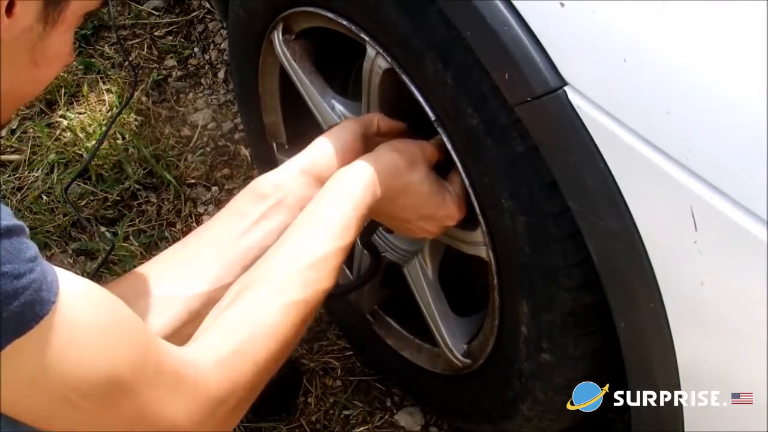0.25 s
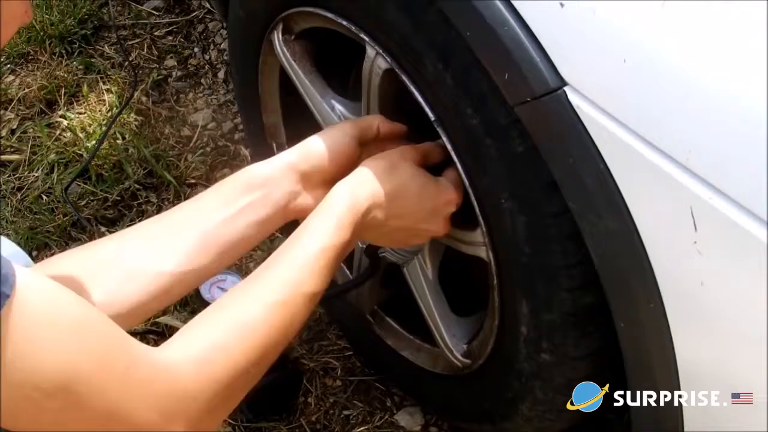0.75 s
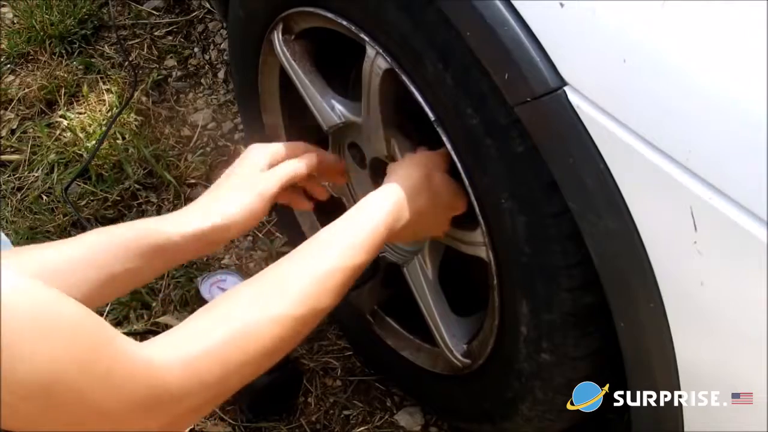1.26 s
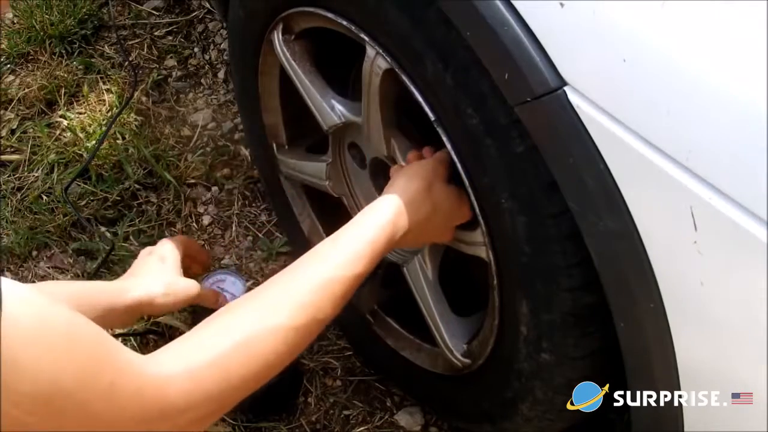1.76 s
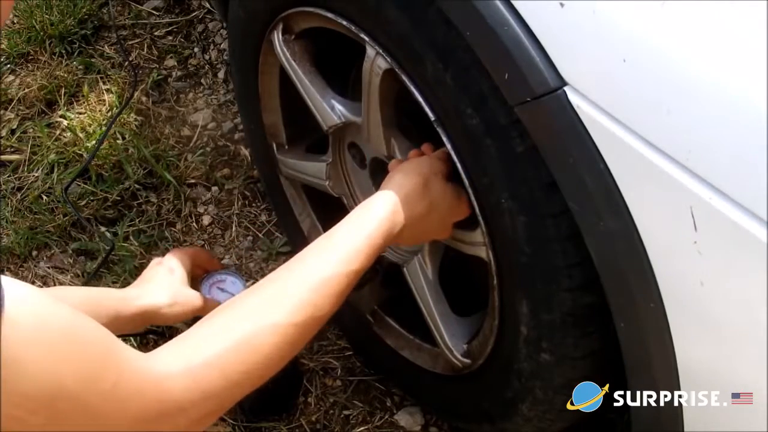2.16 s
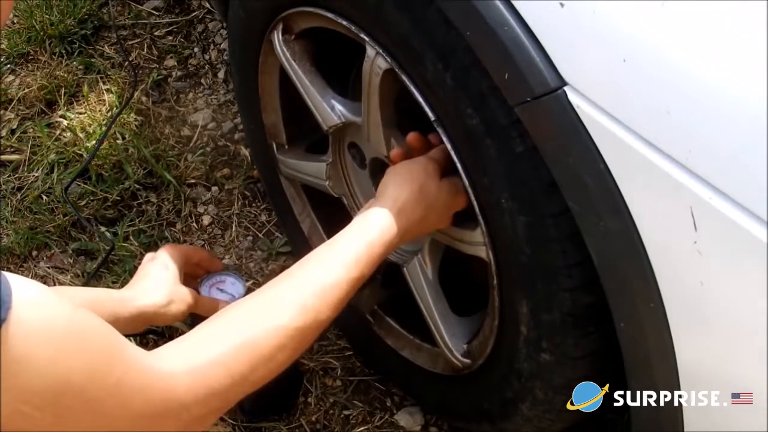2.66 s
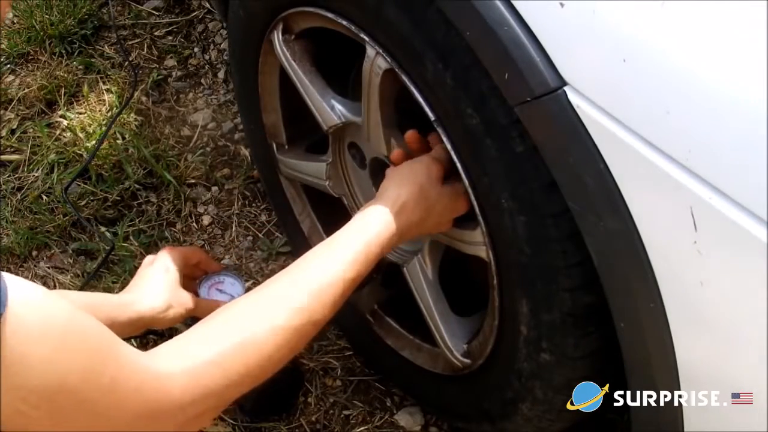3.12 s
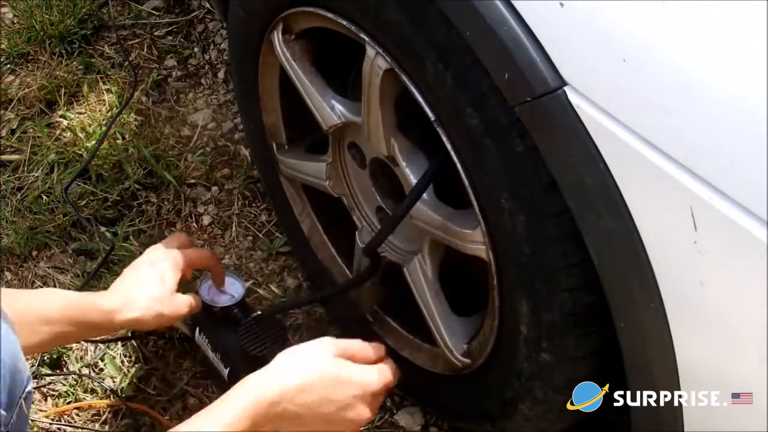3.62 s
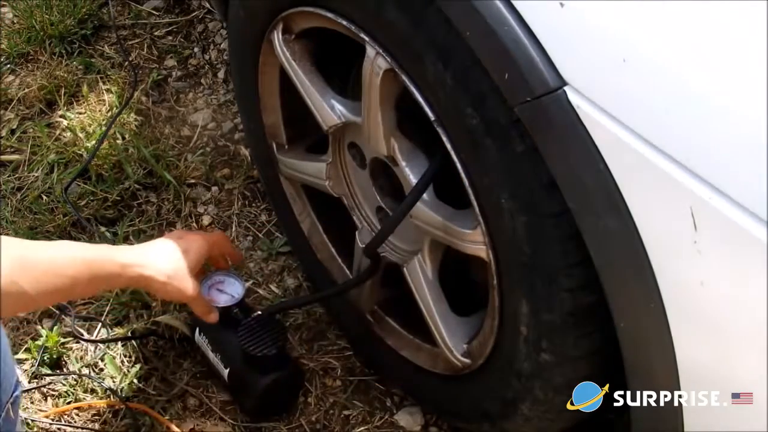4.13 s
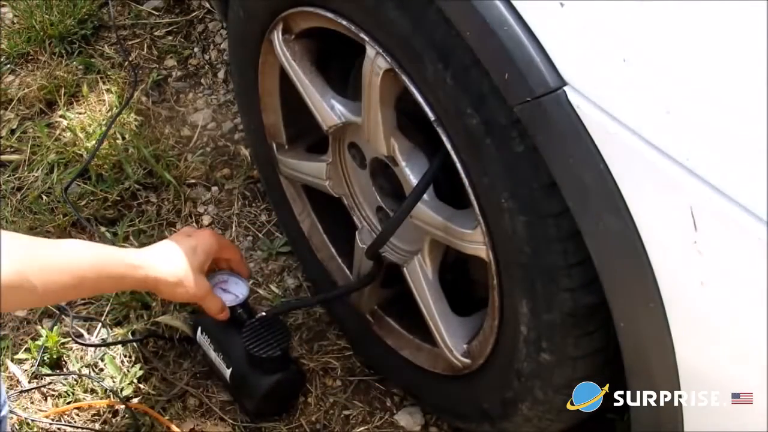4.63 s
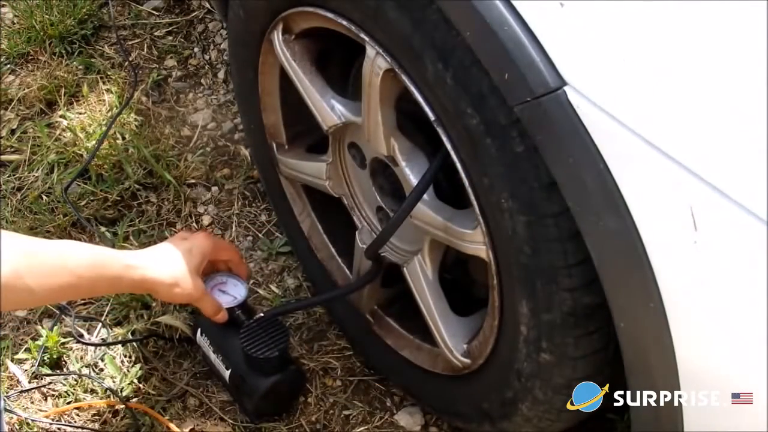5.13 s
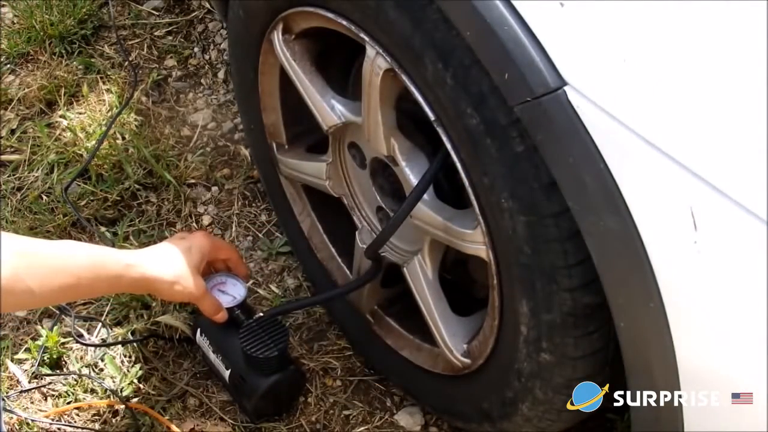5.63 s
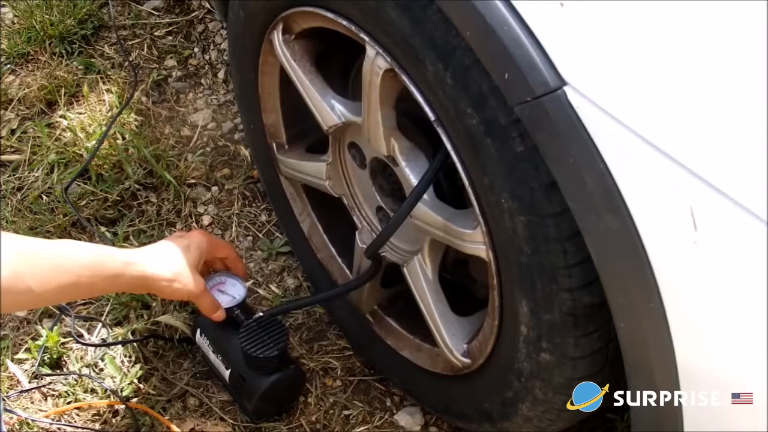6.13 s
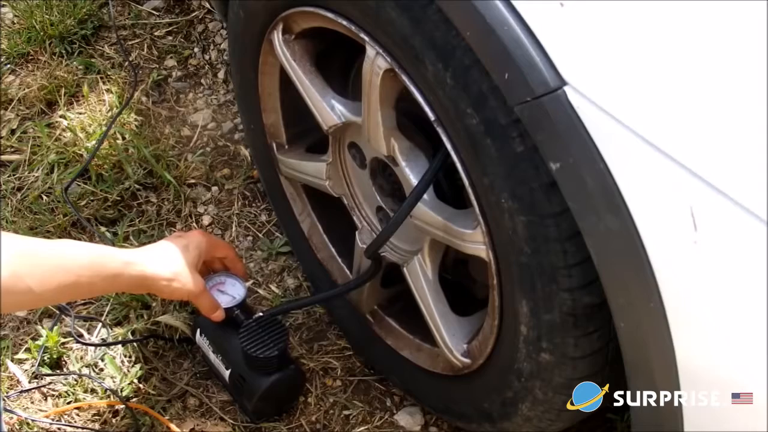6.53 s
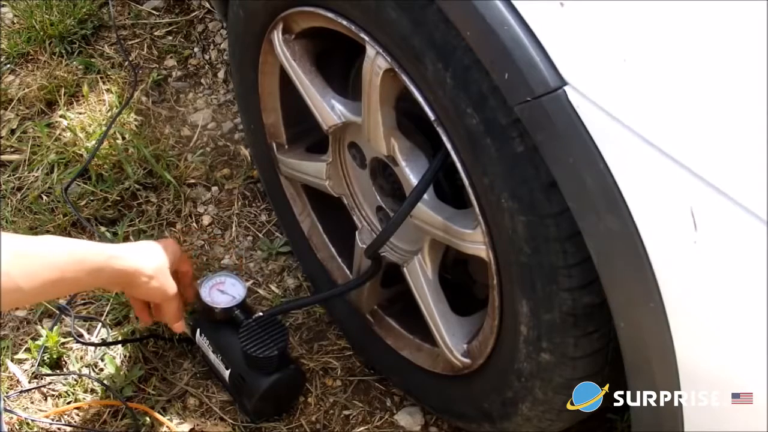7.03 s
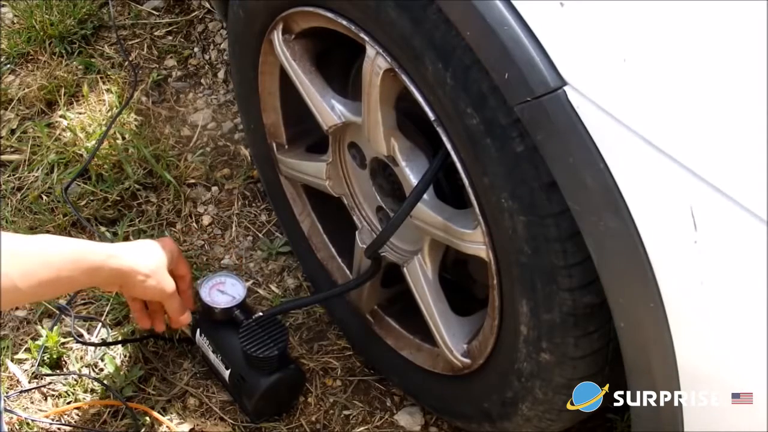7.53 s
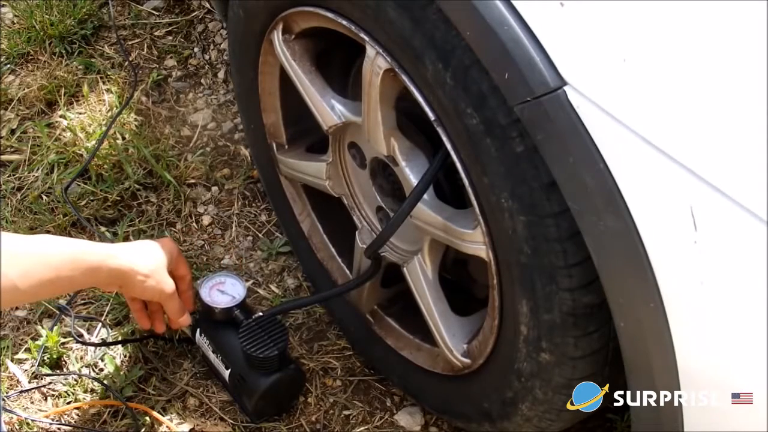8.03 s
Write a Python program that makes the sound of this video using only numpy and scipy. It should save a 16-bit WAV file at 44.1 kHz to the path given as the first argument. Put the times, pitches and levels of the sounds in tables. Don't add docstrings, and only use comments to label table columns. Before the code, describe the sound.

A small portable air compressor runs without pause beside a car wheel, close to the microphone outdoors. Its rapid piston knocking fuses into a harsh, nasal buzz with a metallic whine, plastic rattle and airy hiss. The tone shifts gradually as a hand grips the casing. Soft wind thumps cluster before the middle; later a sharp knock bounces quickly and the level dips, then recovers.

```python
import sys
import numpy as np
from scipy import signal
from scipy.fft import rfft, irfft, next_fast_len
from scipy.io import wavfile
from scipy.ndimage import uniform_filter1d

SR = 44100
rng = np.random.default_rng(int(sys.argv[2]) if len(sys.argv) > 2 else 0)


def level_to_linear(level):
    exponent = np.asarray(level, float) / 20
    return 10 ** exponent


def unload_wav(signal):
    wavfile.write(
        sys.argv[1],
        SR,
        np.round(np.clip(np.atleast_2d(signal).T, -1, 1) * 32767).astype(np.int16),
    )


N = 364707
T = np.arange(N) / SR
SLOW_T = T[::64]
SIZE = next_fast_len(N + SR // 4)
HZ = np.arange(SIZE // 2 + 1) * SR / SIZE
TOP_HZ = 15760


def unit(x):
    return x / np.sqrt(np.mean(x ** 2))


def fine(slow):
    return np.interp(T, SLOW_T, slow)


def through(x, response):
    return irfft(rfft(x, SIZE) * response, SIZE)[:N]


def mode(hz, width):
    return 1j * HZ * width / (hz ** 2 - HZ ** 2 + 1j * HZ * width)


def colour(points):
    hz, db = np.transpose(points)
    return level_to_linear(np.interp(np.log(HZ + 1), np.log(hz), db))


def walk(rate):
    place = SLOW_T * rate
    k = place.astype(int)
    levels = rng.standard_normal(int(9 * rate) + 2)
    blend = np.sin(np.pi / 2 * (place - k)) ** 2
    return 1.15 * (levels[k] + (levels[k + 1] - levels[k]) * blend)


def hits(table, rise, second_db):
    out = np.zeros(N + SR)
    for s, db, hz, t60 in table:
        t = np.arange(int(t60 * SR)) / SR
        shape = (1 - np.exp(-(t * hz / rise) ** 2)) * 1000. ** (-t / t60)
        ring = np.sin(2 * np.pi * hz * t) + level_to_linear(second_db) * np.sin(2 * np.pi * 1.676 * hz * t)
        start = int(s * SR)
        out[start:start + len(t)] += level_to_linear(db) * ring * shape / shape.max()
    return out[:N]


# t/s, rate/(turns per s)
CRANK_SPEED = [(0.0, 45.89), (0.5, 45.855), (0.99, 45.88), (1.65, 45.975), (2.31, 46.005), (3.3, 46.05),
               (3.96, 46.015), (4.62, 45.955), (5.28, 45.93), (5.94, 45.96), (6.6, 46.04), (7.26, 46.06),
               (7.59, 46.02), (8.27, 45.87)]
# t/s, level/dB
ROCKING = [(0.0, -26), (0.45, -27.5), (0.8, -26.5), (1.0, -27), (1.4, -26), (1.95, -27), (2.5, -25.5),
           (2.9, -27), (3.3, -26), (4.1, -26.5), (5.0, -25.5), (5.7, -26), (5.95, -26.5), (6.75, -26),
           (7.0, -27), (7.45, -26), (8.0, -26.5), (8.27, -26.5)]
# t/s, grip/(0-1)
HAND_GRIP = [(0, 0.05), (1.3, 0.17), (1.8, 0.28), (3.6, 0.46), (4.2, 0.7), (5, 1), (8.27, 1)]


def pump():
    turn = np.cumsum(np.interp(T, *np.transpose(CRANK_SPEED)) * fine(1 + .0005 * walk(25))) / SR
    held = np.interp(SLOW_T, *np.transpose(HAND_GRIP))
    level_db = np.interp(SLOW_T, *np.transpose(ROCKING))

    def gain(free_db, held_db):
        return fine(level_to_linear(level_db + free_db + (held_db - free_db) * held))

    body = level_to_linear(-3.0) * casing(BODY_MODES, turn, held, repeat=.03, lag=.1,
                              knock_db=3.0, flicker_db=1.5, spiky_db=1.5)
    body = body + piston(turn, held)
    mesh = casing(MESH_MODES, turn, held, repeat=0.28, lag=0.28,
                  knock_db=3.5, flicker_db=2.0, spiky_db=3.0)
    treble = level_to_linear(-1.5) * casing(TREBLE_MODES, turn, held, repeat=0.38, lag=0.27,
                                knock_db=5.0, flicker_db=0.84, spiky_db=2.0)
    treble = treble + valve(turn, held) + level_to_linear(-2.5) * valve_air(turn) + level_to_linear(-7.0) * outlet_hiss(turn)
    return gain(1.5, -4) * body + gain(-7, -5.5) * mesh + gain(0.32, -1.4) * treble


# crank angle/(turn 0-1), level/dB
KNOCKS_PER_TURN = [
    (.13, -1),
    (.49, 0),
    (.89, -4),
]
# multiple of the crank rate, level/dB
PISTON_LINES = [(1, -28), (2, -25), (3, -24.5), (4, -16.5), (5, -18.5), (6, -12.5), (7, -16.5), (8, -21),
                (9, -5.5), (10, -12.5), (11, -9.5), (12, 1), (13, -10.5), (14, -4), (15, 0), (16, -3.5),
                (17, -7.5), (18, 0.5), (19, -8.5), (20, -7), (21, -4.5), (22, -5.5), (23, -2), (24, 1),
                (25, -5), (26, -21), (27, -4.5), (28, -1), (29, -18), (30, -7.5), (31, -7), (32, -13),
                (33, -6.5), (34, -4), (35, -27), (36, -4), (37, -20.5), (38, -2.5), (39, -19.5), (40, -7),
                (41, -3.5), (42, -4)]


def piston(turn, held):
    motor_hz, motor_db, wobble_rad = 587.2, -11.5, 0.083
    lines, spin, crank = 0, 1, np.exp(2j * np.pi * turn)
    for k, db in PISTON_LINES:
        spin = spin * crank
        knocks = sum(level_to_linear(knock_db) * np.exp(-2j * np.pi * k * at) for at, knock_db in KNOCKS_PER_TURN)
        phase = np.angle(knocks) - .004 * k ** 2 + 0.011 * k * walk(12)
        grip_db = (4 - 9 * held) * np.exp(-((k - 24) / 1.5) ** 2)
        level = level_to_linear(db + grip_db + .9 * walk(5))
        lines = lines + (spin * fine(level * np.exp(1j * phase))).real
    motor = np.sin(2 * np.pi * motor_hz * T + wobble_rad * crank.imag + fine(0.56 * walk(4)))
    return level_to_linear(-3.0) * unit(lines) + fine(level_to_linear(motor_db + .6 * walk(4.06))) * motor


# f/Hz, width/Hz, free level/dB, held level/dB, loudest angle/(turn 0-1), swing per turn/dB
BODY_MODES = [(585, 98, -14.5, -15.5, 0, 1), (821, 74, -5.5, -5.5, 0.35, 3), (937, 80, -9, -3.5, 0.1, 4.5),
              (1106, 59, -2.5, -2, 0.1, -2.5), (1285, 40, -4.5, -2, 0.29, 3.5),
              (1530, 39, -3.5, -0.5, 0.16, 1), (1657, 56, -2, -10, 0.1, 6), (1839, 220, -9, -6, .25, 1.5)]
MESH_MODES = [(2422, 214, -4, -1.5, 0.011, 0.95), (2652, 97, -10.5, -12, 0.0048, 0.67),
              (2750, 330, -2.5, -15.5, 0.045, 0.4)]
TREBLE_MODES = [(3561, 192, -7.5, -1, 0, 4.6), (3728, 120, -8.5, -3.5, 0.12, 2.4),
                (4357, 170, -6, -5.5, 0.15, 3.8), (4770, 150, -6.5, -4.5, 0.14, 2.8),
                (5150, 420, -8, -7, 0.15, 1), (5780, 205, -11.5, -10.5, 0, 4.6),
                (6290, 210, -10.5, -13, 0.16, 4), (7060, 230, -17.5, -9.5, 0.82, 10.1),
                (7370, 140, -17, -9.5, 1, 2.3)]


def casing(modes, turn, held, repeat, lag, knock_db, flicker_db, spiky_db):
    slots = 960
    slot = (turn * slots).astype(int) % slots
    angle = np.arange(slots) / slots
    shake = clatter(slot, slots, repeat, wear=1.2, spiky_db=spiky_db)
    jolts = sum(level_to_linear(db) * np.exp(5.0 * (np.cos(2 * np.pi * (angle - at - .03)) - 1))
                for at, db in KNOCKS_PER_TURN)
    out = 0
    for hz, width, free_db, held_db, at, swing_db in modes:
        stroke_db = swing_db * np.cos(2 * np.pi * (angle - at - lag)) + knock_db * jolts
        ring = through(shake * level_to_linear(stroke_db)[slot], mode(hz, 1.33 * width) ** 2)
        out = out + ring * fine(level_to_linear(free_db + (held_db - free_db) * held + flicker_db * walk(6)))
    return out / np.sqrt(uniform_filter1d(out ** 2, SR // 2))


def clatter(slot, slots, repeat, wear, spiky_db):
    pattern = rng.standard_normal((2, slots))[:, slot]
    same = np.cos(wear * T) * pattern[0] + np.sin(wear * T) * pattern[1]
    sizes = np.minimum(rng.exponential(size=N), 5)
    fresh = unit(rng.standard_normal(N) * level_to_linear(spiky_db * sizes))
    return np.sqrt(repeat) * same + np.sqrt(1 - repeat) * fresh


# f/Hz, free level/dB, held level/dB, angle/(turn 0-1), rise/s
REED_PINGS = [
    (4320, -7.5, -14.5, .27, .0022),
    (4730, -13, -10.5, .19, .002),
    (7085, -23.5, -16.5, .1, .0012),
]


def valve(turn, held):
    slop_s, scatter_db = 1.8e-5, 1.6
    out, chance = 0, rng.standard_normal((int(turn[-1]) + 3, 2))
    for hz, free_db, held_db, at, rise in REED_PINGS:
        late, size = chance[np.floor(turn - at).astype(int) + 1].T
        since = (turn - at) % 1 / CRANK_SPEED[0][1]
        ping = since * np.exp(-since / rise) * np.sin(2 * np.pi * hz * (since - slop_s * late))
        out = out + unit(ping * level_to_linear(scatter_db * size)) * fine(level_to_linear(free_db + (held_db - free_db) * held))
    return out


# f/Hz, density level/dB per Hz
AIR_SPECTRUM = [(59, -56), (100, -42), (358, -12.5), (549, -3.5), (1400, -2.5), (3300, -3.5), (7000, -12.5),
                (16200, -24)]


def valve_air(turn):
    swell_db = 1.4 * np.cos(2 * np.pi * (turn - .3))
    return unit(through(rng.standard_normal(N) * level_to_linear(swell_db), colour(AIR_SPECTRUM)))


# f/Hz, density level/dB per Hz
HISS_SPECTRUM = [(7300, -36.5), (8000, -8.5), (10050, -0.5), (11500, 0), (12500, -7.5), (14500, -5),
                 (15700, -10), (17000, -40)]


def outlet_hiss(turn):
    swell_db = 1.6 * np.cos(2 * np.pi * (turn - .35)) + 1.4 * np.cos(4 * np.pi * (turn - .07))
    jet = rng.standard_normal(N) * fine(level_to_linear(1.2 * walk(90))) * level_to_linear(swell_db)
    return unit(through(jet, colour(HISS_SPECTRUM)))


# t/s, peak level/dB, f/Hz, t60/s
KNOCK_BOUNCES = [
    (5.1124, -4.5, 1300, 0.0095),
    (5.1127, -23, 3600, .004),
    (5.1160, -23, 1200, .015),
    (5.1203, -7, 1150, 0.014),
    (5.1250, -10, 1330, 0.011),
    (5.1257, -12, 2600, 0.004),
    (5.1335, -10, 1410, 0.024),
]


def knock():
    return hits(KNOCK_BOUNCES, rise=0.46, second_db=-14)


# t/s, peak level/dB, f/Hz
SHORT_THUMPS = [(1.718, -27, 152), (2.431, -41, 180), (3.405, -26, 100), (3.215, -19.5, 207),
                (3.288, -26, 78.1), (3.314, -16.5, 232), (3.345, -20, 140), (3.358, -20.5, 232),
                (3.394, -14.5, 313), (3.511, -13.5, 328), (3.5428, -14, 520), (3.556, -14.5, 360),
                (3.564, -20, 328), (3.642, -20, 280), (3.709, -27, 210), (3.767, -32, 108),
                (4.554, -33, 103), (5.391, -21.5, 139), (5.631, -33, 172), (5.721, -31, 194),
                (5.828, -9, 450), (5.842, -19, 433), (5.886, -23, 146), (5.958, -31, 190),
                (7.163, -31, 91.5), (7.45, -29, 170), (7.733, -25, 217), (7.75, -30, 133), (7.812, -31, 194),
                (8.071, -33, 61)]


def thumps():
    rings = [(s, db, hz, min(.04, 7.5 / hz)) for s, db, hz in SHORT_THUMPS]
    return hits(rings, rise=0.59, second_db=-6.0)


# t/s, peak level/dB, length/s
WIND_GUSTS = [(2.0, -43, .03), (2.08, -40, .07), (2.306, -41, 0.034), (2.448, -34.5, .04), (2.56, -39, .07),
              (2.794, -39, 0.033), (2.9, -43, .04), (3.06, -36.5, 0.12), (3.215, -35, .05),
              (3.328, -25, 0.11), (3.555, -31, 0.066), (3.65, -33, 0.035), (3.766, -34, 0.054),
              (3.91, -38, .045), (4.14, -43, 0.055), (4.29, -38, .04), (4.567, -40, 0.036), (4.92, -47, .1),
              (5.4, -32, 0.039), (5.56, -42, .06), (5.64, -45, .03), (5.76, -37, .06), (5.906, -35, 0.096),
              (6.697, -43, .09), (7.175, -42, 0.13), (7.47, -36, .07), (7.6, -37, .06), (7.745, -33, .07),
              (7.95, -47, 0.039), (8.08, -39, 0.03)]
# f/Hz, density level/dB per Hz
GUST_SPECTRUM = [(10, -45), (25, -11), (60, -3.5), (130, -0.5), (250, -8.5), (400, -23.5), (700, -47.5)]


def gusts():
    calm_db, fall_db, rise = -58.5, -15, 0.71
    lumps = unit(rng.standard_normal(N) * fine(level_to_linear(3.5 * walk(60))))
    swell = level_to_linear(calm_db)
    for s, db, length in WIND_GUSTS:
        away = np.maximum(SLOW_T - s, (s - SLOW_T) / rise) / length
        swell = swell + level_to_linear(db + fall_db * away)
    return level_to_linear(20.0) * through(lumps * fine(swell), colour(GUST_SPECTRUM))


def scene():
    return (pump() + knock() + thumps() + gusts())[None]


# f/Hz, width/Hz, depth/(0-1)
PORT_NOTCHES = [(1440, 80, .6), (3170, 120, .6), (6400, 150, .6), (12950, 500, .97), (14980, 250, .9)]


def port(x):
    response = np.prod([1 - depth * mode(hz, width) for hz, width, depth in PORT_NOTCHES], axis=0)
    return through(x, response * (HZ < TOP_HZ))


def duck(x):
    start_s, grab_s, depth_db, recover_s = 5.122, .013, -7.5, 0.24
    since = np.maximum(T - start_s, 0)
    duck_db = depth_db * (1 - np.exp(-(since / grab_s) ** 2)) * np.exp(-(since / recover_s) ** 1.7)
    return x * level_to_linear(duck_db)


STARVED_FRAMES = [1, 2, 3, 7, 11, 15, 18, 19, 37, 52, 58, 80, 81, 86, 95, 103, 112, 116, 138, 150, 157, 205,
                  245, 246, 323, 373, 377, 378]
COARSENESS = [10, 13, 10, 10, 11, 11, 8.2, 9, 8.5, 11, 6.1, 9.8, 10, 11, 11, 9, 8.2, 11, 11, 12, 12, 10,
              9.5, 12, 8.3, 8.9, 11, 11]


def starve(x, tilt_db):
    frame = round(1024 * SR / 48000)
    n, k = np.arange(2 * frame) + .5, np.arange(frame) + .5
    window = np.sin(np.pi * n / frame / 2)
    basis = window * np.cos(np.pi / frame * np.outer(k, n + frame / 2))
    at = (np.array(STARVED_FRAMES)[:, None] - 1) * frame + np.arange(2 * frame) + 180
    terms = x[at] @ basis.T
    spread = terms.std(axis=1, keepdims=True)
    step_db = np.array(COARSENESS)[:, None] + tilt_db * np.log2(k / 100)
    local = np.sqrt(uniform_filter1d(terms ** 2, size=80)) / spread
    step = spread * local ** 0.38 * level_to_linear(step_db)
    lost = (terms - step * np.round(terms / step)) @ basis * 2 / frame
    return x - np.bincount(at.ravel(), lost.ravel(), N)


def low_pass(x):
    return signal.sosfilt(signal.butter(12, 16320, fs=SR, output="sos"), x)


def record(dry):
    x = duck(port(dry[0]))
    x = starve(x, tilt_db=-0.07)
    mix = through(x, HZ < TOP_HZ)[None]
    return low_pass(mix)


dry = scene()
out = record(dry)
unload_wav(out)
```